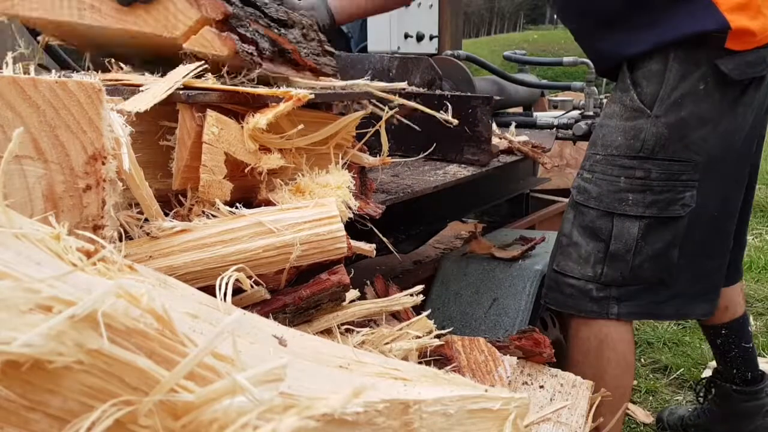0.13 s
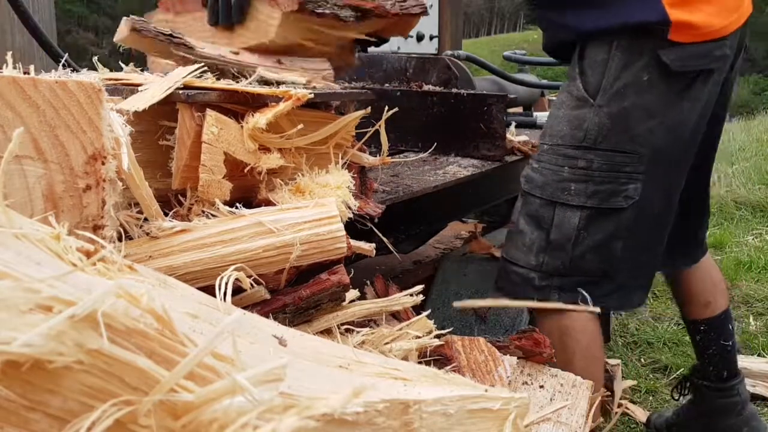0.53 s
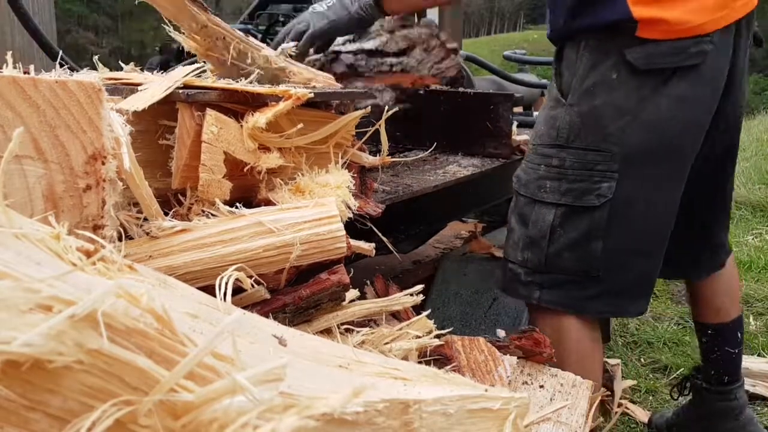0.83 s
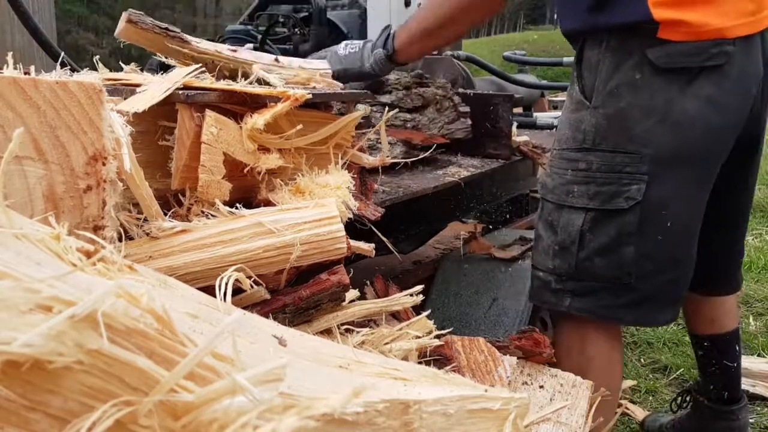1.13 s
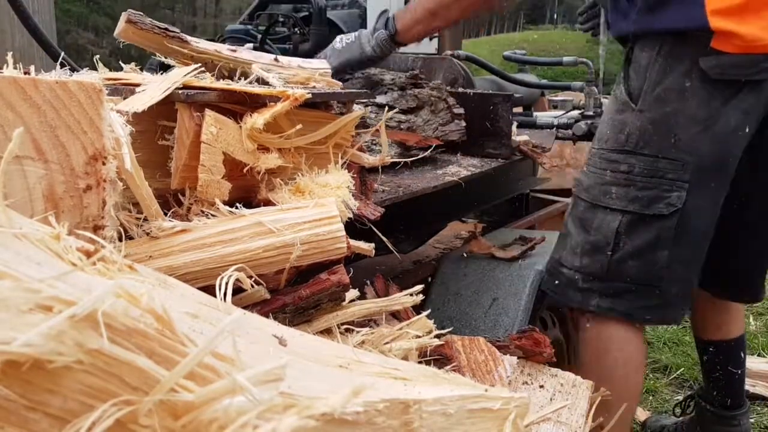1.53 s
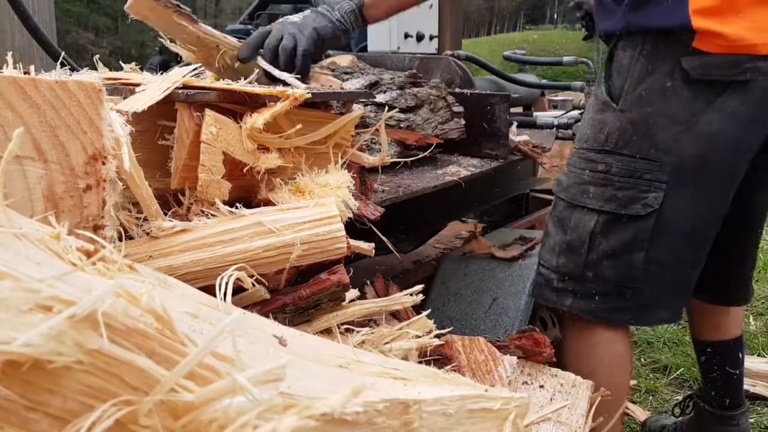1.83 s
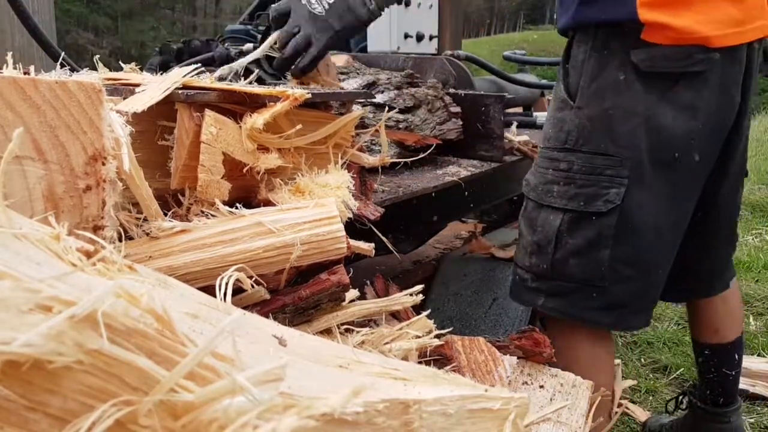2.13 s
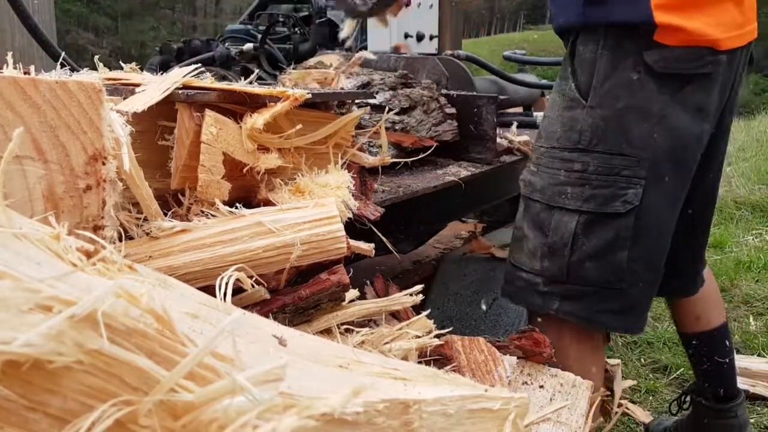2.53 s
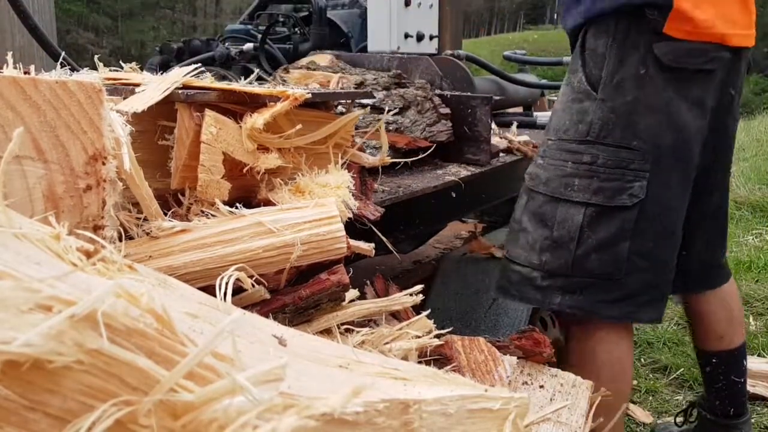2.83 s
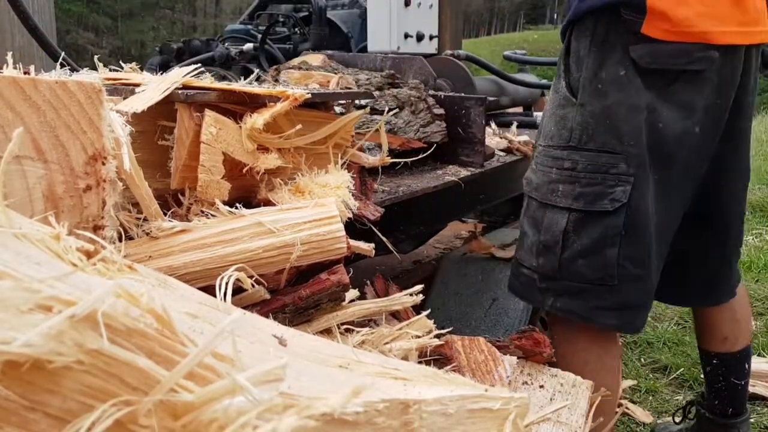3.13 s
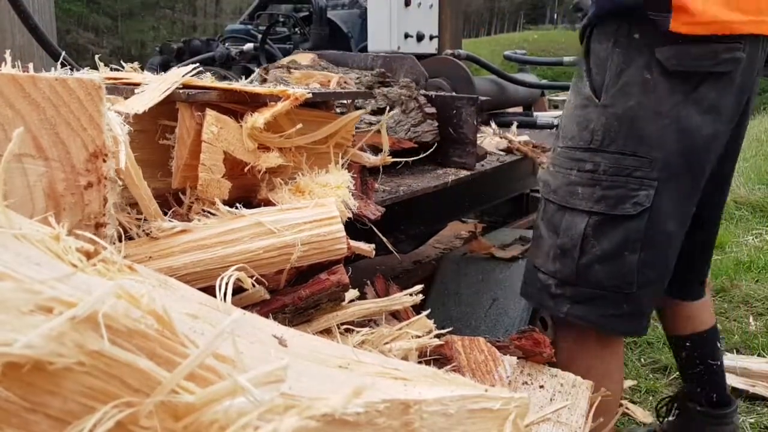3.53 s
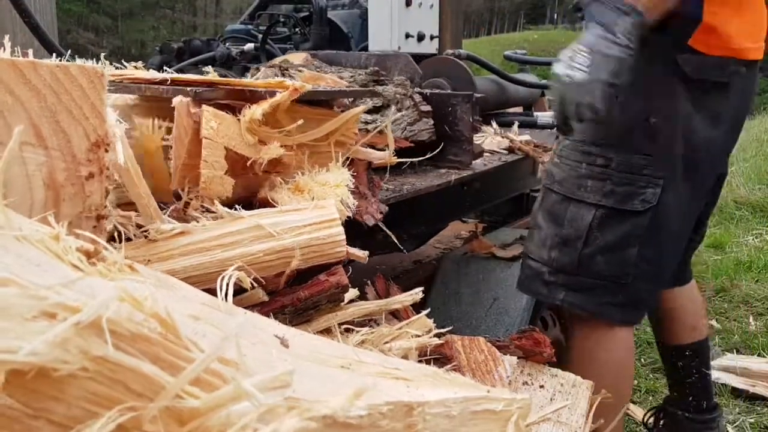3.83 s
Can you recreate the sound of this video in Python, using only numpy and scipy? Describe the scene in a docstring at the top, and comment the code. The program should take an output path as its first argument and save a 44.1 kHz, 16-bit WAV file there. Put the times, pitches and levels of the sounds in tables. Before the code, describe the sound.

Steady throbbing diesel engine outdoors, with a bark crunch, log knocks and pieces landing on wood.

```python
"""A three-cylinder diesel throbs outdoors, driving a log splitter; it sags and whines when the pump takes load.
Its hum is sines locked to one crankshaft; its drone, clatter and hiss are noise swelling with the firings.
A split log crunches over its bark (bursts of tiny cracks) and tumbles onto the steel bed (ringing wood).
Later two pieces land on the woodpile, splinters snap, and one piece glances off the steel frame."""
import sys
import numpy as np
from scipy import signal
from scipy.fft import rfft, irfft
from scipy.io import wavfile

SR = 44100
rng = np.random.default_rng(int(sys.argv[2]) if len(sys.argv) > 2 else 0)


def store_pcm(level_fs):
    """Save levels as 16-bit WAV."""
    pcm = np.round(np.clip(level_fs, -1, 1) * 32767).astype(np.int16)
    wavfile.write(sys.argv[1], SR, np.atleast_2d(pcm).T)


N = 175959
TIME = np.arange(N) / SR
FREQS = np.maximum(np.fft.rfftfreq(N, 1 / SR), 1)
LEFT_DB, LAG_S = 3.5, .00008   # left minus right [dB], delay of the right side [s]
PIVOT_HZ = 710   # brightness tilts a blow about this pitch
TILT_TOP_HZ = 5900   # brightness tilts a crunch up to this pitch


def from_db(db):
    """Turn decibels into gain."""
    return 10 ** (np.asarray(db) / 20)


def rms_one(x):
    """Scale a sound to rms 1, a standard average strength."""
    return x / np.sqrt(np.mean(x ** 2) + 1e-20)


def in_time(rows):
    """Draw a table as a curve with a value at every sample."""
    return np.interp(TIME, *np.transpose(rows))


def over_hz(rows, axis=1):
    """Draw one column of a table over every frequency, evenly by octave."""
    rows = np.array(rows)
    return np.interp(np.log(FREQS), np.log(rows[:, 0]), rows[:, axis])


def colour(x, spectrum, tilt_db=0):
    """Give noise a spectrum, tilted by some dB per octave, at rms 1."""
    octaves = np.log2(np.clip(FREQS, PIVOT_HZ / 2, TILT_TOP_HZ))
    gain = from_db(over_hz(spectrum) + tilt_db * octaves)
    return rms_one(irfft(rfft(x) * gain, N))


def ring(x, hz, t60):
    """A click sets a sine ringing; it fades by 60 dB in t60 seconds."""
    shrink = from_db(-60 / (t60 * SR))   # per sample
    angle = 2 * np.pi * hz / SR
    feedback = [1, -2 * shrink * np.cos(angle), shrink * shrink]
    return signal.lfilter([0, np.sin(angle)], feedback, x + 1e-18)


def clicks(s, db):
    """Put single-sample clicks at given times and levels."""
    samples = (np.abs(s) * SR).astype(int)
    return np.bincount(samples, from_db(db), N)[:N]


def place(x, left_db, lag_s):
    """Pan a sound by loudness and by a later arrival on the right."""
    left = x * from_db(left_db / 2)
    right = np.interp(TIME - lag_s, TIME, x) * from_db(-left_db / 2)
    return np.array([left, right])


# the engine's stereo picture: (frequency [Hz], left minus right [dB], likeness of the two sides [0-1])
STEREO_IMAGE = [(60, 36, 0), (128, 2, 0), (308, 13.5, 0.78), (530, 1.5, 1), (1020, 1, 0.36),
                (2040, 7, 0.46), (4150, 1.5, 0), (7750, 1.5, 0.15), (12600, 13, 0)]


def spread(pair):
    """Mix two unrelated noises into left and right, as alike at each pitch as the table says."""
    mid, side = rfft(pair)
    alike = np.clip(over_hz(STEREO_IMAGE, axis=2), -1, 1)
    tilt = from_db(over_hz(STEREO_IMAGE) / 2)
    mid, side = mid * np.sqrt(1 + alike), side * np.sqrt(1 - alike)
    delay = np.exp(-2j * np.pi * FREQS * LAG_S)
    return irfft([(mid + side) * tilt, (mid - side) / tilt * delay], N)


CYLINDERS = 3
UNEVEN = 0.26   # share by which the swell varies from firing to firing


def rattle(turns, spectrum, repeat, swing_db, lead, count=1):
    """Vibration that partly repeats every engine cycle and swells count times per firing."""
    size = int(SR * TIME[-1] / (turns[-1] - turns[0])) // 2 * 2   # samples in an average cycle
    cycle = irfft(np.exp(2j * np.pi * rng.random((2, size // 2 + 1))))
    same = rms_one(np.array([np.interp(turns, np.arange(size) / size, c, period=1) for c in cycle]))
    repeat = np.clip(repeat, 0, 1)
    fresh = rng.standard_normal((2, N))
    noise = spread(np.sqrt(repeat) * same + np.sqrt(1 - repeat) * fresh)
    firing = count * CYLINDERS * turns + lead
    accents = 1 + UNEVEN * rng.standard_normal(int(firing[-1]) + 2)
    accent = accents[np.round(firing).astype(int)]
    swell = from_db(swing_db * accent * (2 + np.cos(2 * np.pi * firing)))
    return colour(noise * swell, spectrum)


def tone(turns, order, db):
    """A sine locked to the engine, at an rms level."""
    return np.sqrt(2) * from_db(db) * np.cos(2 * np.pi * order * turns)


# exhaust note: (multiple of the cycle rate, level running free [dB], level under load [dB])
EXHAUST_TONES = [(3, -34, -38), (4, -42, -42), (6, -18.7, -15.7), (7, -36, -37), (9, -20.3, -17.9),
                 (10, -29, -29), (11, -38, -37), (12, -24.5, -22.3), (18, -30, -30)]
MUFFLER_ORDER = 5   # the muffler's resonance, as a multiple of the cycle rate


def exhaust(turns, load):
    """Low tones add up to a throb per firing; those below the muffler's resonance are inverted."""
    out = 0
    for order, free, loaded in EXHAUST_TONES:
        level = free + load * (loaded - free)
        out = out + np.sign(order - MUFFLER_ORDER) * tone(turns, order, level)
    return out


# higher tones of engine and pump: (multiple of the cycle rate, level free [dB], level loaded [dB])
PUMP_TONES = [(24, -44, -30), (28, -41, -37), (36, -39.5, -37), (39, -43, -36.5), (43, -38.5, -40),
              (48, -58, -41), (126, -56, -38)]
STRAIN_HZ, STRAIN_DB = 59.4, -32.3   # below this firing rate the pump whines


def strain_of(speed):
    """How hard the ram strains: it rises from 0 to 1 as the firing rate falls by 1 Hz."""
    return np.clip(STRAIN_HZ - speed, 0, 1)


def pump(turns, load, speed):
    """Tones that follow the load settle back to their free levels and a whine joins as the ram strains."""
    shaft, strain = turns + rng.random(), strain_of(speed)
    out = 0
    for order, free, loaded in PUMP_TONES:
        out = out + tone(shaft, order, free + load * (1 - strain) * (loaded - free))
    whine = tone(shaft, order=24, db=STRAIN_DB + 1) + tone(shaft, order=48, db=STRAIN_DB)
    return out + strain * whine


# low sound of the engine casing: (frequency [Hz], relative level [dB per Hz])
DRONE_SPECTRUM = [(25, -41), (70, -3.5), (200, 4), (300, -5), (440, -5.5), (550, 2), (850, -2),
                  (1000, -6.5), (1400, -12.5), (2500, -51)]


def drone(turns, load, speed):
    """The casing hums with each firing, a little louder under load and softer when strained."""
    level = -22.5 + 1.15 * load - 4.2 * strain_of(speed)
    return from_db(level) * rattle(turns, DRONE_SPECTRUM, repeat=.68, swing_db=2.5, lead=0.25)


# middle and high sound of the engine casing: (frequency [Hz], relative level [dB per Hz])
CLATTER_SPECTRUM = [(600, -18), (1100, -1), (1450, 0.5), (2000, 2.5), (2900, -0.5), (4000, -6), (5200, -13),
                    (7400, -14.5), (9300, -35), (10500, -23), (15000, -39.5)]


def clatter(turns, load):
    """The casing rattles with each firing, less regularly than the drone."""
    level = -28.0 - 0.26 * load
    return from_db(level) * rattle(turns, CLATTER_SPECTRUM, repeat=0.36, swing_db=1.5, lead=-0.04)


# top treble: (frequency [Hz], relative level [dB per Hz])
HISS_SPECTRUM = [(7000, -37), (9400, -23.5), (10500, -1), (12500, 3.5), (15000, 1.5)]
# strength of that treble within the engine: (time [s], level [dB])
HISS_CURVE = [(0, -43), (1.9, -41), (2.4, -42), (2.55, -38), (3.2, -38.5), (3.99, -38.5)]


def valves():
    """Number of valve clicks per firing."""
    return 2


def hiss(turns):
    """Valve clicks are heard as treble noise that swells twice per firing."""
    noise = rattle(turns, HISS_SPECTRUM, repeat=0.3, swing_db=2.5, lead=.18, count=valves())
    return from_db(in_time(HISS_CURVE)) * noise


# combustion knock of each cylinder: (place in the cycle [0-1], ring [Hz], level [dB], clack t60 [s])
CYLINDER_KNOCKS = [(.29, 2870, -25, 0.055), (.635, 2640, -27.5, 0.057), (.955, 2940, -33.5, 0.032)]
# dry clack of a knock: (frequency [Hz], relative level [dB per Hz])
CLACK_SPECTRUM = [(500, -43), (1500, -8.5), (3000, 3.5), (4000, 1.5), (5000, -10), (7400, -21), (9300, -37)]
KNOCK_JITTER_S, KNOCK_SPREAD_DB = .0003, 1   # random shifts in time and strength
RING_T60_S, RING_DB = .036, 1   # ring of the engine block


def knocks(turns, left_db=2, ring_left_db=11):
    """Each firing sets off a brief clack, never twice alike, and rings the block at its cylinder's pitch."""
    clack = colour(rng.standard_normal((2, N)), CLACK_SPECTRUM)
    clack = clack * from_db([[left_db / 2], [-left_db / 2]])
    out = 0
    for at, hz, db, t60 in CYLINDER_KNOCKS:
        s = np.interp(np.arange(at, turns[-1]), turns, TIME)
        late, strong = rng.standard_normal((len(s), 2)).T
        kicks = clicks(s + KNOCK_JITTER_S * late, db + KNOCK_SPREAD_DB * strong)
        force = signal.lfilter([1], [1, -from_db(-60 / (t60 * SR))], kicks)
        block = from_db(RING_DB) * ring(kicks, hz, RING_T60_S)
        out = out + force * clack + place(block, ring_left_db, LAG_S)
    return out


# engine speed: (time [s], firing rate [Hz])
FIRING_RATE = [(0, 59.65), (.9, 59.555), (1.05, 60.911), (1.2, 60.765), (1.35, 60.235), (3.45, 60.203),
               (3.6, 58.806), (3.75, 57.918), (3.87, 58.768), (3.99, 58.924)]
# overall engine level, which dips for about a second: (time [s], level [dB])
ENGINE_LEVEL = [(0, -0.5), (.94, -1), (1.06, -3.5), (1.22, -6.5), (2.04, -6.5), (2.3, -2.5), (2.55, -.5),
                (3.1, -0.5), (3.99, -1)]
START_TURN = .135   # place in the engine cycle at the start
FREE_HZ, SAG_HZ, MAX_LOAD = 60.15, .55, 1.1   # the load is read from the sag in speed
KNOCK_LOADED_DB = -4.5   # change of the knocks at load 1


def engine():
    """Exhaust, pump, casing, valves and knocks all follow one crankshaft."""
    speed = in_time(FIRING_RATE)
    turns = START_TURN + np.cumsum(speed) / SR / CYLINDERS   # engine cycles so far
    load = np.clip((FREE_HZ - speed) / SAG_HZ, 0, MAX_LOAD)
    hum = place(exhaust(turns, load) + pump(turns, load, speed), LEFT_DB, LAG_S)
    casing = drone(turns, load, speed) + clatter(turns, load)
    knocking = from_db(KNOCK_LOADED_DB * load) * knocks(turns)
    return from_db(in_time(ENGINE_LEVEL)) * (hum + casing + hiss(turns) + knocking)


# crunches of bark and splinters: (time [s], level [dB], t60 [s], brightness [dB per octave])
CRUNCH_BURSTS = [(0.8258, -11, .04, 2), (0.833, -18, 0.4, -0.5), (.858, -28, .12, -4),
                 (.9, -20.5, 0.35, -5), (0.9207, -17.5, .07, 1.5), (.9535, -16, 0.016, -3),
                 (1.0, -18, 0.14, -3.5), (3.42, -13, 0.17, -4.5), (3.655, -20, .13, 1),
                 (3.685, -30.5, 0.7, 6), (3.708, -12.5, 0.021, 1), (3.749, -20, 0.014, 4),
                 (3.849, -22, .05, 2.5), (3.873, -21.5, 0.027, 2)]
# sound of breaking bark: (frequency [Hz], relative level [dB per Hz])
BARK_SPECTRUM = [(150, -33), (400, 12), (900, 9.5), (1400, 8), (2200, 7), (3500, 1), (5500, -8.5),
                 (7500, -15), (9300, -23.5), (11000, -18.5), (15000, -19)]
SNAP_S = .0005   # time a burst takes to reach full force


def crunches(grains_per_s=7000, size_db=-3.5, left_db=5.0):
    """Bursts of tiny fractures: dull in the bark, bright where fibres snap."""
    sizes = from_db(size_db * np.minimum(rng.exponential(1, N), 4))
    sizes = sizes * (rng.random(N) < grains_per_s / SR)
    # part of each grain is shared by both sides, part is not
    grains = sizes * (rng.standard_normal(N) + rng.standard_normal((2, N)))
    out = 0
    for s, db, t60, bright in CRUNCH_BURSTS:
        rise = np.clip((TIME - s) / SNAP_S, 0, 1)
        fade = from_db(db - 60 * np.clip((TIME - s) / t60, 0, 2))
        out = out + rise * fade * colour(grains, BARK_SPECTRUM, bright)
    return out * from_db([[left_db / 2], [-left_db / 2]])


def blows(hits, modes, t60, debris_db, debris_t60, left_db):
    """Blows ring the wood's own pitches, higher ones more briefly; loose chips rattle on at each side."""
    s, db, bright = np.transpose(hits)
    wood = 0
    for k, (hz, level) in enumerate(modes):
        uneven = 2 * rng.standard_normal(len(s))
        strikes = clicks(s, db + level + bright * np.log2(hz / PIVOT_HZ) + uneven)
        wood = wood + (-1) ** k * ring(strikes, hz, t60 * np.sqrt(PIVOT_HZ / hz))
    wood = place(wood, left_db, LAG_S)
    size = SR // 4   # the chips last a quarter second at most
    debris = rng.standard_normal((2, size)) * from_db(-60 * TIME[:size] / debris_t60)
    debris *= from_db(debris_db) / np.sqrt(np.sum(debris ** 2) / 2)
    return wood + signal.fftconvolve(wood, debris, axes=1)[:, :N]


# blows of the log on the bed: (time [s], level [dB], brightness [dB per octave])
LOG_BLOWS = [(.9525, -10.5, 1), (.961, -18, 1), (.969, -11, 0.5), (.980, -20, 2), (.990, -12.5, -1.5),
             (1.0, -25, -5), (1.016, -22, 0)]
# pitches at which the log rings: (frequency [Hz], level [dB])
LOG_PITCHES = [(366, 4), (518, -3), (643, 1), (740, -2), (870, -3.5), (985, -8), (1116, -9), (1330, -7),
               (1900, -14)]


def log_tumble():
    """The split log knocks several times on the steel bed."""
    return blows(LOG_BLOWS, LOG_PITCHES, t60=0.053, debris_db=-5.0, debris_t60=0.154, left_db=2.0)


# blows of a first piece on the pile: (time [s], level [dB], brightness [dB per octave])
CHUNK_BLOWS = [(3.378, -26, 9), (3.4195, -21, 4), (3.422, -13, 1), (3.430, -10, -4.5)]
# pitches at which that piece rings: (frequency [Hz], level [dB])
CHUNK_PITCHES = [(295, -5.5), (522, -3), (640, -5), (790, -11), (1130, -8), (1215, -0.5), (1297, -3),
                 (1857, -4), (2400, -7.5)]


def chunk_drop():
    """A first piece drops on the woodpile with a short ring."""
    return blows(CHUNK_BLOWS, CHUNK_PITCHES, t60=0.039, debris_db=-4, debris_t60=0.19, left_db=0.5)


# blows of a second piece, landing and settling: (time [s], level [dB], brightness [dB per octave])
PIECE_BLOWS = [(3.541, -15.5, -5), (3.5455, -16.5, 4), (3.552, -25, 7), (3.574, -19, -1), (3.598, -26, 1)]
# pitches at which that piece rings: (frequency [Hz], level [dB])
PIECE_PITCHES = [(295, -3.5), (370, -2), (560, -10), (760, -16), (867, -10), (1070, -8), (1244, -2.5),
                 (1390, -10), (1933, -5.5), (2550, -6), (2890, -12)]


def piece_landing():
    """A second, longer-ringing piece lands and settles."""
    return blows(PIECE_BLOWS, PIECE_PITCHES, t60=0.083, debris_db=-1.5, debris_t60=0.31, left_db=6.0)


# a piece glances off the steel frame: (time [s], level [dB])
FRAME_HITS = [(3.554, -16.5)]
# pitches at which the frame rings: (frequency [Hz], level [dB], t60 [s])
FRAME_PITCHES = [(953, -0.5, .36), (1020, -7, 0.17)]


def frame():
    """The steel frame rings briefly at its own pitches."""
    touch = clicks(*np.transpose(FRAME_HITS))
    steel = sum(from_db(db) * ring(touch, hz, t60) for hz, db, t60 in FRAME_PITCHES)
    return place(steel, LEFT_DB, LAG_S)


def scene():
    """The engine and the handling of the wood, heard together."""
    wood = crunches() + log_tumble() + chunk_drop() + piece_landing()
    return engine() + wood + frame()


CUTOFF_HZ = 14900


def record(dry):
    """Peaks are clipped at full scale, then the top treble is cut steeply."""
    low_pass = signal.cheby2(24, 70, CUTOFF_HZ + 200, fs=SR, output="sos")
    return signal.sosfilt(low_pass, np.clip(dry, -1, 1))


dry = scene()
out = record(dry)
store_pcm(out)
```